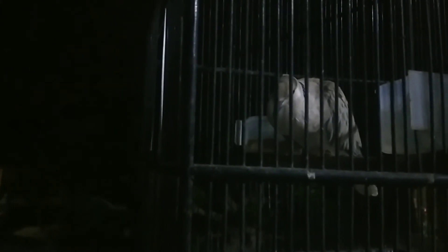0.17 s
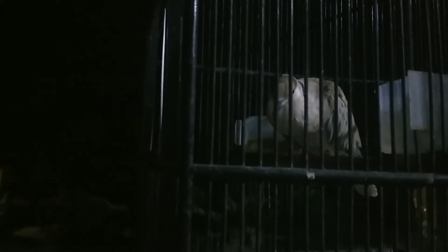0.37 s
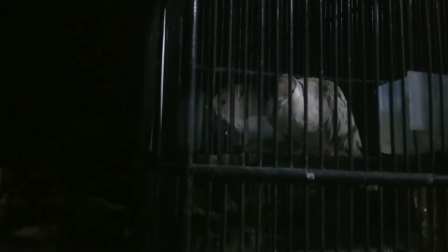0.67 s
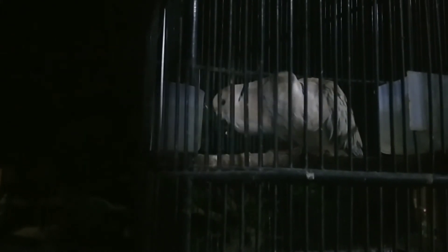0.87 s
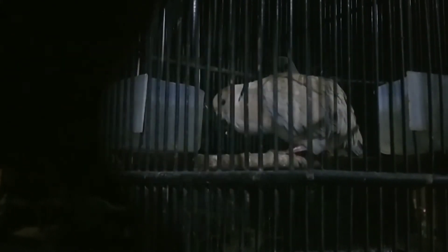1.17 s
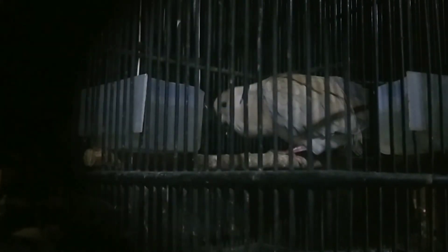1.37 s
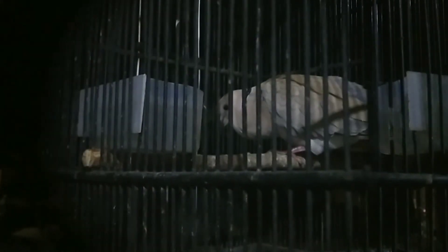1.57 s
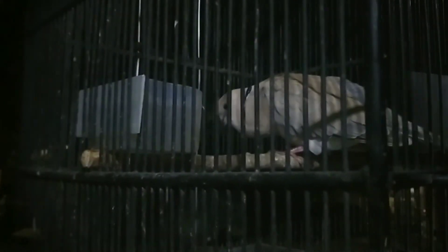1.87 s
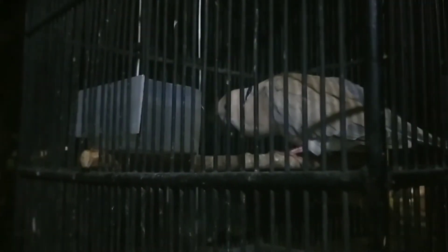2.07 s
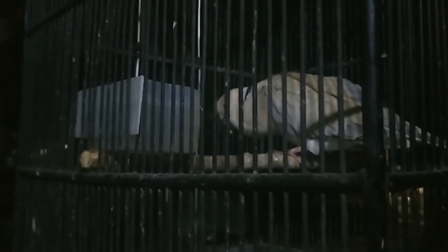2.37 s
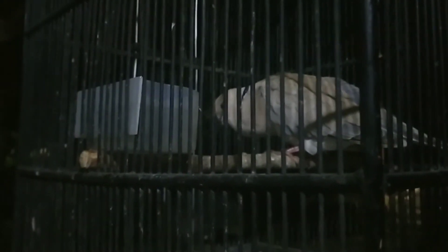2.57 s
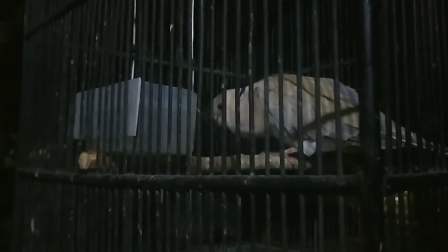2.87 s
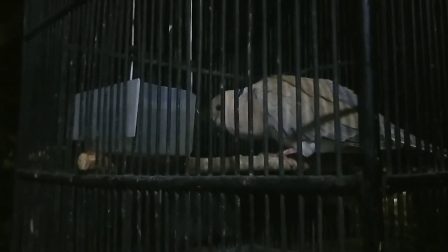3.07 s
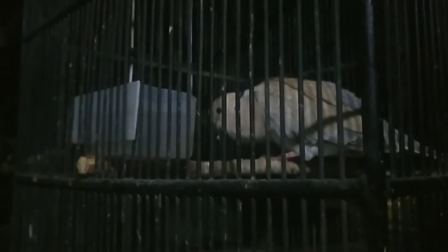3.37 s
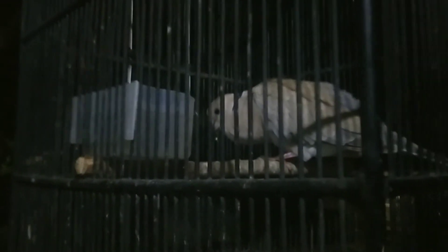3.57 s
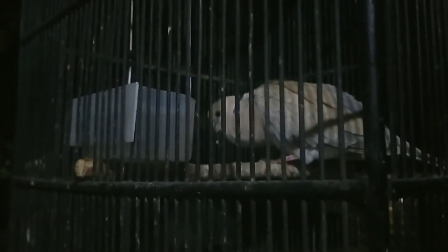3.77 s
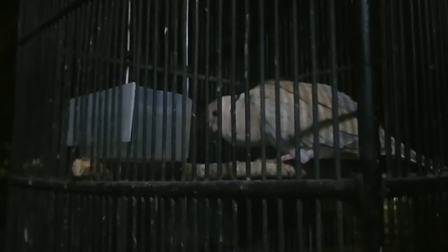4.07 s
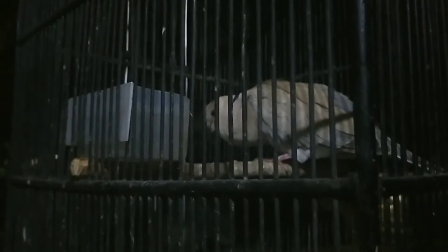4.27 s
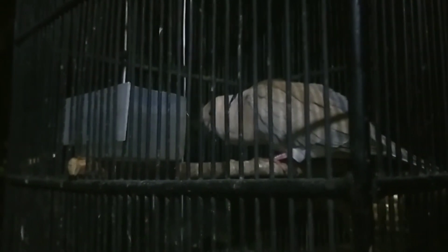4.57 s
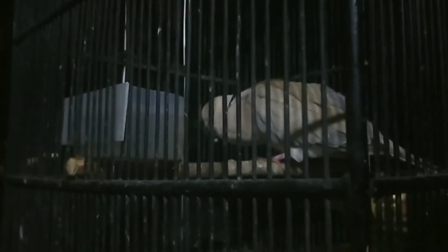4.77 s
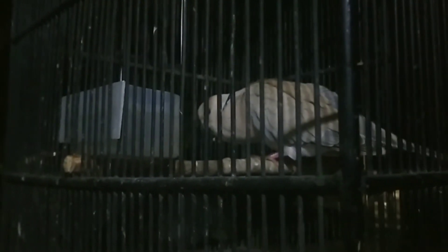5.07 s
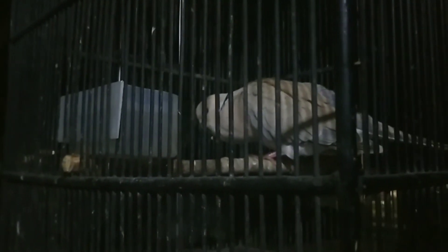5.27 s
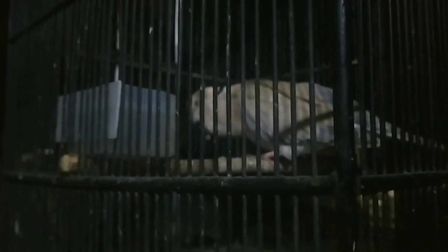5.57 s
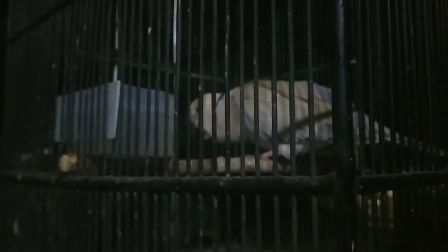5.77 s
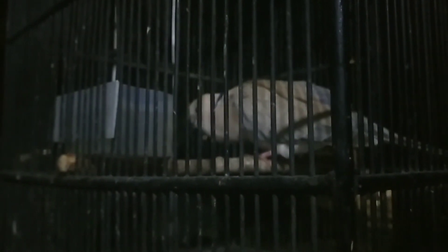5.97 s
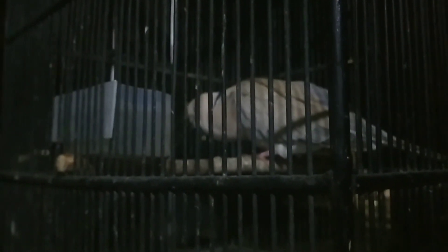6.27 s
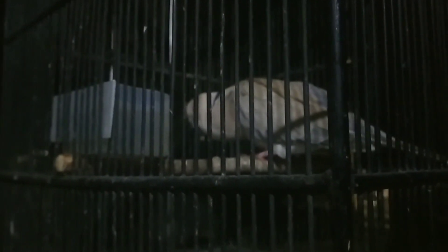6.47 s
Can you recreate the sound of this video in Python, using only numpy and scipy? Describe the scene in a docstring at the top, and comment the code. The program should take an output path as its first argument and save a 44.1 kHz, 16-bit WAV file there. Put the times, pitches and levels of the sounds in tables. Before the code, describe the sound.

Outdoors at night, a dove in a cage coos close to the microphone. The tail of one long coo fades, then a buzzy intake leads to a short coo, a stutter of growing soft notes and a long smooth coo that sinks away. Another rough intake, short coo and stutter follow, cut off at the end. A near katydid chirps rapidly throughout over distant katydids, insect chorus and faint low rumble.

```python
"""A caged dove coos outdoors at night, close to the microphone: near-sinusoids with weak overtones.
The fading end of one long coo leads to a full phrase: buzzy intake (pulses ringing a throat resonance),
short coo, swelling stutter and a long coo that sinks away; a second phrase gets as far as its stutter.
Katydids, one near (trains of gliding whistles) and others far (throbbing noise bands), sing over an insect
chorus, a cricket trill, a faint hoarse animal call, soft rustles and swells, ticks, rumble, air and hiss."""
import sys
import numpy as np
from scipy import signal
from scipy.fft import rfft, irfft
from scipy.io import wavfile
from scipy.ndimage import uniform_filter1d

SR = 44100
rng = np.random.default_rng(int(sys.argv[2]) if len(sys.argv) > 2 else 0)


def dump_mix(stems):
    """Bounce the given channels to the path in sys.argv[1] as a 16-bit WAV at rate SR."""
    frames = np.atleast_2d(stems).T  # one column per channel
    limited = np.clip(frames, -1, 1)  # hard clip at full scale
    pcm = np.round(limited * 32767).astype(np.int16)
    wavfile.write(sys.argv[1], SR, pcm)


N = 292383
TIME = np.arange(N) / SR  # s
BINS = np.fft.rfftfreq(N, 1 / SR)  # Hz
# upper band edge of the hiss and of the output [f/Hz]
EDGE_HZ = 14300


def amp(db):
    """Amplitude ratio from level: 20 dB is a factor of ten."""
    return 10 ** (np.asarray(db) / 20)


def unit(x):
    """Normalisation to a root-mean-square of 1."""
    return x / np.sqrt(np.mean(x ** 2) + 1e-20)


def read(points, hz):
    """Interpolation of a spectrum along a logarithmic frequency axis."""
    f, value = np.transpose(points)
    return np.interp(np.log(hz + 1), np.log(f + 1), value)


def add(mix, s, sound):
    """Superposition: a sound is added to the mix from time s, in place."""
    part = mix[max(round(s * SR), 0):][:len(sound)]
    part += sound[:len(part)]


def drift(rate_hz):
    """Random modulation: low-passed Gaussian noise of rms 1."""
    white = rfft(rng.standard_normal(N))
    return unit(irfft(white / (1 + (BINS / rate_hz) ** 4), N))


def sides(balance_db):
    """Interchannel level difference: left and right gains whose mean is 1."""
    balance = np.atleast_1d(balance_db)
    gains = amp(np.array([balance, -balance]) / 2)
    return gains / gains.mean(0)


def gate(start, end, fade):
    """Time window: 1 between two times, with short linear ramps."""
    return np.clip(np.minimum(TIME - start, end - TIME) / fade + .5, 0, 1)


def resonate(x, hz, width):
    """Resonance by heterodyne: shift the moving centre to zero, low-pass, and shift back."""
    turn = np.exp(2j * np.pi * np.cumsum(hz * np.ones(N)) / SR)
    r = np.exp(-np.pi * width / SR)
    baseband = signal.lfilter([1 - r], [1, -r], x / turn + 1e-18)
    return 2 * (turn * baseband).real


def noise(gain, alike, balance_db):
    """Partly coherent noise: coloured, with a set interchannel correlation; the mid signal has rms 1."""
    a, b = rng.standard_normal((2, N))
    c = np.clip(alike, -1, 1)
    channels = np.array([a, c * a + np.sqrt(1 - c * c) * b])
    pair = irfft(rfft(channels) * gain, N) * sides(balance_db)
    return pair / pair.mean(0).std()


def echoes(x, t60, delay):
    """Diffuse reflection: exponentially decaying noise taps, independent at each microphone."""
    t = TIME[:SR // 2]
    taps = rng.standard_normal((2, len(t))) * amp(-60 * t / t60) * (t > delay)
    taps = taps / np.linalg.norm(taps, axis=1)[:, None]
    return signal.fftconvolve(x[None], taps, axes=1)[:, :N]


def dove(room_db=-24):
    """Direct plus diffuse sound: the cage's standing waves give the channels different gain and phase."""
    # the sinking end of a long coo [t/s, f/Hz, level/dB]
    fading_coo = [(0.0, 406, -34.5), (0.02, 399, -35), (0.392, 377.6, -43), (0.565, 355.7, -41.5),
                  (0.61, 348, -48), (0.648, 339, -47), (0.668, 325.5, -65), (0.715, 316, -56),
                  (0.76, 295, -74)]
    # a short coo that scoops up, breaks into the high register and sags [t/s, f/Hz, level/dB]
    first_coo = [(1.49, 359, -58.5), (1.511, 400, -36.5), (1.54, 447, -24), (1.557, 495, -25.5),
                 (1.62, 490.5, -29), (1.67, 470.4, -27), (1.717, 456.4, -27), (1.745, 446, -38.5),
                 (1.78, 453, -50), (1.82, 456, -66)]
    # a scoop, one flat arch, then a drop to the low register and a slow sinking [t/s, f/Hz, level/dB]
    long_coo = [(2.581, 372.2, -54), (2.59, 383.4, -41), (2.647, 445, -24.5), (2.68, 483.3, -26),
                (2.7, 488.3, -28.5), (2.745, 496, -28.5), (2.773, 466.6, -26), (2.801, 467, -27.5),
                (2.82, 480.2, -28), (2.949, 477.3, -26.5), (3.339, 492, -28.5), (4.11, 482.2, -25),
                (4.151, 481.4, -27), (4.35, 474, -25.5), (4.462, 463.2, -24), (4.5, 421, -30),
                (4.521, 415.7, -32.5), (4.58, 401.5, -41), (4.851, 373.4, -41), (4.885, 368.6, -46),
                (4.98, 349.3, -47), (5.03, 334, -59), (5.052, 335, -65), (5.1, 321, -62.5)]
    # a short coo that stays in the low register [t/s, f/Hz, level/dB]
    last_coo = [(5.785, 359.6, -67.5), (5.808, 403, -38), (5.827, 434.4, -28.5), (5.841, 439.6, -25),
                (6.008, 420.2, -31.5), (6.034, 440, -37), (6.06, 445, -72)]
    # buzzy intakes, uneven in level [t/s, level/dB, pulse rate/Hz, throat resonance f/Hz]
    intake_curves = [
        [(0.86, -46, 141, 474), (0.9, -45.5, 139.1, 488), (.97, -45.5, 134.5, 454), (1.012, -46, 136.1, 472),
         (1.045, -45.5, 134, 475), (1.092, -47.5, 130.7, 484), (1.106, -44.5, 133.7, 499),
         (1.235, -45.5, 131.3, 505), (1.265, -43, 138.6, 552), (1.286, -42.5, 143.1, 543),
         (1.316, -44, 136.1, 585), (1.352, -44, 130, 586), (1.403, -42, 127.1, 616), (1.42, -45, 125.4, 630),
         (1.446, -49.5, 122.4, 608), (1.462, -59, 122, 606)],
        [(5.135, -48, 137.2, 445), (5.145, -49, 137.1, 471), (5.19, -49.5, 132.9, 475), (5.32, -54, 129, 430),
         (5.352, -53, 126.4, 436), (5.385, -49.5, 127.6, 456), (5.44, -52, 129.5, 447),
         (5.475, -52, 130.6, 463), (5.5, -46, 135.6, 525), (5.535, -40.5, 137.7, 550),
         (5.56, -46.5, 136.2, 590), (5.58, -45.5, 134.6, 615), (5.604, -44.5, 137.5, 650),
         (5.612, -37.5, 135.5, 660), (5.626, -40.5, 135.4, 644), (5.645, -46, 133.5, 655),
         (5.7, -43.5, 131, 650), (5.753, -50.5, 122, 615)],
    ]
    # the cage favours the left side for low notes [f/Hz, left-right level/dB]
    cage_balance = [(250, 11), (380, 12.5), (410, 11.5), (438, 6), (468, 1), (550, -1), (680, -3.5),
                    (1200, 2.5)]
    # the left microphone leads a little [f/Hz, phase/rad]
    cage_lead = [(350, 0.11), (415, 0.081), (445, 0.15), (470, 0.15), (490, 0.5), (600, 0.25)]
    coos = sum(coo(rows) for rows in (fading_coo, first_coo, long_coo, last_coo))
    voice = coos + stutter() + sum(intake(rows) for rows in intake_curves)
    half_lead = np.array([[.5], [-.5]]) * read(cage_lead, BINS)
    ports = sides(read(cage_balance, BINS)) * np.exp(1j * half_lead)
    return irfft(rfft(voice) * ports, N) + amp(room_db) * echoes(voice, t60=1.0, delay=0.066)


def coo(rows, jitter=0.0035, shimmer=0.032, fuzz_db=-50, buzz_rough=.5):
    """Near-sinusoidal voice of a swollen throat; frequency and amplitude tremble more in the low register."""
    # overtones by pitch, the low register being the richer one [f/Hz, level under the fundamental/dB]
    second_harmonic = [(300, -7), (326, -6.5), (345, -29), (378, -24.5), (410, -27.5), (440, -36),
                       (456, -47.5), (480, -67)]
    third_harmonic = [(300, -18), (372, -43.5), (408, -25), (440, -44.5), (480, -40)]
    # the long coo turns husky before it sinks [start t/s, end t/s, extra air level/dB]
    husky_from, husky_to, husky_db = (4.0, 4.44, 17)
    # for a moment the third harmonic buzzes [start t/s, end t/s, level under the fundamental/dB]
    buzz_from, buzz_to, buzz_db = (4.03, 4.12, -39)
    s, *columns = np.transpose(rows)
    hz, level = (np.interp(TIME, s, c) for c in columns)
    swing_hz, beat_db = scoop_beat()
    flick_hz, dip_db = catches()
    hz = hz + swing_hz + flick_hz
    level = level + beat_db - dip_db
    slack = np.interp(hz, [390, 460], [3.5, 1])
    phase = 2 * np.pi * np.cumsum(hz * (1 + slack * jitter * drift(110))) / SR
    tone = np.sin(phase) * (1 + slack * shimmer * drift(52))
    air = amp(fuzz_db + husky_db * gate(husky_from, husky_to, 0.046)) * slack ** 2
    fuzz = air * drift(82) * np.sin(phase * 1.26)  # a little air just above the note
    since_start = abs(TIME - s[0])
    late_db = -7 * np.exp(-since_start / 0.22)  # the third harmonic is the last to build up
    buzz = amp(buzz_db) * gate(buzz_from, buzz_to, 0.012) * (1 + buzz_rough * drift(100))
    overtones = amp(read(second_harmonic, hz)) * np.sin(2 * phase)
    overtones += (amp(read(third_harmonic, hz) + late_db) + buzz) * np.sin(3 * phase)
    overtones *= amp(-11 * np.exp(-since_start / 0.011))  # each coo starts pure and then fills out
    return np.sqrt(2) * (tone + fuzz + overtones) * amp(level) * gate(s[0], s[-1], 0.007)


def scoop_beat():
    """Decaying beat, as a swing of pitch (Hz) and level (dB) in antiphase: flattest where loudest."""
    # after the break, the scoop's echo beats briefly with the new note
    # [start t/s, pitch swing/Hz, beat rate/Hz, level swing/dB, decay time/s]
    start, swing_hz, rate, swing_db, dying = (2.674, 3, 64, 1.4, 0.077)
    t = np.maximum(TIME - start, 0)
    beat = np.exp(-t / dying) * np.sin(2 * np.pi * rate * t)
    return -swing_hz * beat, swing_db * beat


def catches():
    """Transient modulation: Gaussian flicks of pitch (Hz) and dips of level (dB) where the voice catches."""
    # catches, as at a change of register [t/s, dip/dB, half length/s, pitch flick/Hz]
    catch_rows = [(1.551, 9, 0.0032, 55), (1.567, 6.5, 0.0064, 7.5), (1.736, 12, 0.004, -57),
                  (2.665, 8.5, 0.0043, 39.5), (4.515, 6, 0.0045, -28), (1.361, 4.5, 0.0026, 0),
                  (5.544, 13, .003, -1)]
    flick, dip = np.zeros((2, N))
    for at, depth_db, half, flick_hz in catch_rows:
        catch = np.exp(-np.minimum(((TIME - at) / half) ** 2, 20))
        flick, dip = flick + flick_hz * catch, dip + depth_db * catch
    return flick, dip


def stutter(hz=440, half=0.0051, squareness=3.3, fall=0.1, after_db=-12, after_at=0.014,
            after_half=0.02, after_hz=368, gain_db=-.5, low_hz=318):
    """Tone bursts: each puff of a few falling cycles trails a lower flutter; stronger puffs last longer."""
    # loud notes that slow down and mostly grow louder, with faint ones between the last
    # [t/s, level before gain_db/dB]
    notes = [(1.991, -44), (2.034, -42), (2.085, -40.5), (2.138, -36), (2.198, -33), (2.2647, -31),
             (2.339, -28), (2.381, -43), (2.426, -28), (2.4792, -39.5), (2.525, -27.5), (6.283, -46),
             (6.327, -41), (6.377, -41), (6.433, -36.5), (6.49, -33.5), (6.5558, -29), (6.629, -28)]
    out, t = np.zeros(N), TIME[:SR // 8] - .02
    for s, db in notes:
        length = amp(0.38 * (db + 32.0))  # relative to a note at -32 dB
        glide = hz * (1 - fall * np.tanh(t / 0.0093))
        envelope = np.exp(-abs(t / length / half) ** squareness)
        puff = envelope * np.sin(2 * np.pi * np.cumsum(glide) / SR)
        first, late = rng.random(2)
        swell = np.exp(-((t - after_at) / length / after_half) ** 2)
        flutter = swell * np.sin(2 * np.pi * (after_hz * t + first))
        late_swell = np.exp(-((t / length - .038) / 0.017) ** 2)
        flutter += 0.39 * late_swell * np.sin(2 * np.pi * (400 * t + late))
        flutter *= 1 + 0.55 * np.sin(2 * np.pi * (90 * t + late))
        add(out, s - .02, amp(db + gain_db) * (puff + amp(after_db) / length * flutter))
    # the throat radiates little below its resonance
    return irfft(rfft(out) / np.sqrt(1 + (low_hz / (BINS + 1)) ** 20), N)


def intake(rows, width_hz=140, jitter=0.11, swing=.05, chest_hz=380, chest_width_hz=200,
           chest_db=-21, hum_db=-68, calm_rough=.08):
    """Source and filter: slow pulses of drawn air ring a moving throat resonance, over a low hum."""
    # spells in which the buzz breaks up [start t/s, end t/s, added roughness/1, strong-weak limp/1]
    spells = [(.99, 1.03, .15, .4), (1.03, 1.18, .2, .1), (1.18, 1.26, .25, .4), (1.305, 1.41, .42, .15),
              (5.35, 5.485, .27, .3), (5.545, 5.6, .4, .1), (5.635, 5.74, .14, .05)]
    # fixed resonances of the cage that the buzz excites [f/Hz, width/Hz, level/dB]
    cage_ring = [(545, 45, -7), (660, 60, -3)]
    s, *columns = np.transpose(rows)
    level, rate, hz = (np.interp(TIME, s, c) for c in columns)
    rough = calm_rough + sum(r * gate(start, end, .015) for start, end, r, _ in spells)
    limp = sum(m * gate(start, end, .015) for start, end, _, m in spells)
    steady = np.cumsum(rate) / SR  # pulses counted so far
    turns = steady + jitter * rough * drift(70) + swing * limp * np.cos(np.pi * steady)
    pulses = sum(np.cos(2 * np.pi * k * turns) for k in range(2, 9))
    pulses = pulses * np.exp(.4 * rough * drift(84))
    pulses *= 1 + limp * np.cos(np.pi * turns)  # strong and weak pulses alternate
    # a puff of air with each pulse
    pulses += 1.6 * rough * drift(700) * (1 + .5 * np.cos(2 * np.pi * turns))
    chest = amp(chest_db) * resonate(pulses, chest_hz, chest_width_hz)
    voice = resonate(resonate(pulses, hz, width_hz), hz, width_hz) - chest
    voice = voice + sum(amp(db) * resonate(voice, ring_hz, width) for ring_hz, width, db in cage_ring)
    voice /= np.sqrt(uniform_filter1d(voice ** 2, size=1300) + 1e-9)  # even out, so that level governs
    hum = amp(hum_db) * np.sqrt(2) * np.sin(2 * np.pi * 2 * steady)  # the body passes the second harmonic
    return (voice * amp(level - catches()[1]) + hum) * gate(s[0], s[-1], 0.0043)


def katydid(sweep=0.0523, half=0.00373, rasp=0.26, uneven_db=0.5, octave_db=-33, balance_db=2):
    """Stridulation: each chirp is a run of quick wing scrapes, whistles that fall in pitch, with echoes."""
    # bouts, each at an even tempo [start t/s, end t/s, chirp period/s, 0 full chirps or 1 paired strokes]
    bouts = [(.062, 1.39, .1152, 0), (1.493, 2.35, .115, 0), (2.421, 4.86, .11935, 0),
             (4.919, 6.6, .1153, 1)]
    # level of each bout, to which the stroke levels are added [level/dB]
    bout_db = [-48, -41.5, -42, -39.5]
    # wing strokes in a chirp [t from the main stroke/s, full-chirp level/dB, paired-chirp level/dB, f/Hz]
    strokes = [(-.031, -10.5, -17, 6150), (-.021, -5, -3.5, 6260), (-.011, -4, -10, 6250),
               (-.001, -2, -1.5, 6280), (.009, -3.5, -4.5, 6200)]
    song, t = np.zeros(N), TIME[:SR // 50] - 1 / 100
    chirps = [(s, db, paired) for (start, end, period, paired), db in zip(bouts, bout_db)
              for s in np.arange(start, end, period)]
    chances = rng.standard_normal((len(chirps), len(strokes), 3))
    for (s, db, paired), chirp_chances in zip(chirps, chances):
        for (offset, full_db, paired_db, hz), (slip, detune, force) in zip(strokes, chirp_chances):
            glide = hz * (1 + 0.0051 * detune - sweep * t / half)
            phase = 2 * np.pi * np.cumsum(glide) / SR
            whistle = np.sin(phase) + amp(octave_db) * np.sin(2 * phase)
            scrape = np.exp(-(t / half) ** 2) * whistle
            stroke_db = db + (paired_db if paired else full_db) + uneven_db * force
            add(song, s + offset + .001 * slip + t[0], amp(stroke_db) * scrape)
    song *= 1 + rasp * drift(630)
    return sides(balance_db) * (song + amp(-5) * echoes(song, t60=0.14, delay=0.004))


def far_katydids(half=0.03, rasp=0.38, balance_db=3):
    """Temporal smearing: distance blurs each chirp into a soft, grainy swell of band noise."""
    # farther, higher katydids throb at tempos of their own [start t/s, end t/s, chirp period/s]
    far_bouts = [(.052, 1.38, .108), (1.427, 3.12, .1099), (3.185, 4.8, .1062), (4.866, 5.44, .1078),
                 (5.508, 6.7, .1092), (.055, 3.1, .1222)]
    # level at the top of each bout's swells [level/dB]
    far_bout_db = [-56.5, -55.5, -54.5, -59.5, -54.5, -61.5]
    # relative spectrum of their rasp [f/Hz, level/dB]
    far_rasp = [(5900, -41), (6450, -6), (6750, 3), (6950, 2), (7200, -8.5), (7500, -16.5), (7900, -15.5),
                (8600, -45), (10000, -52.5)]
    power = np.zeros(N)
    for (start, end, period), db in zip(far_bouts, far_bout_db):
        count = np.clip(np.round((TIME - start) / period), 0, (end - start) // period)
        nearest = start + period * count
        power += amp(db) ** 2 * np.exp(-np.minimum(((TIME - nearest) / half) ** 2, 20))
    colour = amp(read(far_rasp, BINS)) * (abs(BINS - 7500) < 2500)
    grain = 1 + rasp * drift(100)
    return np.sqrt(power) * grain * noise(colour, alike=.1, balance_db=balance_db)


def insects(chorus_db=-2.05, trill_db=-61.0, flutter=0.13, waver_hz=9):
    """Incoherent summation: a high chorus and a lower cricket trill as noise bands with wavering tones."""
    # course of the chorus, before chorus_db [t/s, level/dB]
    chorus_level = [(0, -56), (1.3, -53.5), (1.7, -54), (4.6, -54), (4.85, -48.5), (5.3, -52.5),
                    (6.6, -51.5)]
    # relative spectra of the high chorus and the lower cricket trill [f/Hz, level/dB]
    chorus_spectrum = [(5000, -48), (5600, -15.5), (6100, -11.5), (6450, -2), (6750, -1.5), (6950, -5),
                       (7150, -13.5), (7450, -24), (7900, -27.5), (8500, -47.5)]
    trill_spectrum = [(1900, -24), (2120, -10), (2230, -7.5), (2295, 0.5), (2345, -7), (2420, -6.5),
                      (2490, -12), (2600, -29.5)]
    # narrow wavering tones within the chorus and trill [f/Hz, level/dB]
    tone_rows = [(2295, -63), (2389, -69), (2433, -83), (6522, -59.5), (6721, -64), (6879, -64),
                 (6921, -70.5), (7024, -66)]
    level = amp(np.interp(TIME, *np.transpose(chorus_level)) + chorus_db)
    chorus_colour = amp(read(chorus_spectrum, BINS) - 60 * (abs(BINS - 6750) > 1900))
    chorus = noise(chorus_colour, alike=0.051, balance_db=3.5)
    trill_colour = amp(read(trill_spectrum, BINS) - 60 * (abs(BINS - 2250) > 450))
    trill = noise(trill_colour, alike=0.072, balance_db=5.0)
    # the tones waver independently at each microphone
    tones = [sum(amp(db) * np.sin(2 * np.pi * np.cumsum(hz + waver_hz * drift(22.56)) / SR)
                 for hz, db in tone_rows) for side in "LR"]
    bands = level * chorus * (1 + flutter * drift(76)) + amp(trill_db) * trill
    return bands + np.sqrt(2) * sides(5.0) * np.array(tones)


def far_call(waver=0.0073, breath_db=-11, gain_db=-2.0, direct_db=-4, balance_db=3):
    """Formant filtering: throat-weighted harmonics make a hoarse arch, heard mostly as reflections."""
    # a far animal's drawn-out call [t/s, f/Hz, level before gain_db/dB]
    call_curve = [(0.082, 450.6, -66), (0.161, 465.3, -55.5), (0.269, 493, -51), (0.391, 472.4, -61),
                  (.56, 445, -62)]
    # relative throat response [f/Hz, level/dB]
    throat = [(450, -20), (900, -12), (1450, -0.5), (1900, 8.5), (2350, -18), (2900, -9), (3350, -9),
              (4200, -12)]
    s, *columns = np.transpose(call_curve)
    hz, level = (np.interp(TIME, s, c) for c in columns)
    phase = 2 * np.pi * np.cumsum(hz * (1 + waver * drift(54))) / SR
    call = unit(sum(amp(read(throat, k * hz)) * np.sin(k * phase) * (1 + amp(breath_db) * drift(150))
                    for k in range(1, 10)))
    call = call * amp(level + gain_db) * gate(s[0], s[-1], 0.034)
    return sides(balance_db) * (amp(direct_db) * call + echoes(call, t60=1.0, delay=0.00046))


def rustles_and_swells(ragged_db=2.0):
    """Band-limited noise under cosine envelopes: narrow bands sound toned, wide ones hazy or rough."""
    # soft rustles, bumps, and hazy rough or toned swells
    # [t/s, length/s, level/dB, centre f/Hz, width/Hz, left-right level/dB]
    soft_sounds = [(0.183, 0.51, -67, 128, 122, 13), (0.247, 0.64, -62, 826, 197, -0.5),
                   (0.375, 1, -66, 1500, 700, -14), (0.887, .12, -75, 8800, 2500, 3),
                   (0.964, 0.27, -73.5, 3200, 900, 3), (1.26, 0.2, -61.5, 160, 159, 14),
                   (1.325, 0.32, -79, 8900, 2500, 7), (2.004, 0.42, -73.5, 3400, 1200, 2),
                   (2.603, 0.16, -70, 3960, 1200, 3), (2.62, 0.27, -67.5, 8300, 2900, 10),
                   (4.048, 0.14, -67, 3440, 526, 9), (4.07, 0.2, -59.5, 1490, 280, 6.5),
                   (4.153, .4, -66, 860, 300, 2), (4.203, 0.7, -66, 180, 80, 12),
                   (6.24, 0.18, -62.5, 262, 35, 14), (6.25, 0.81, -67, 724, 190, 0)]
    out, ragged = np.zeros((2, N)), drift(35)
    for s, length, db, hz, width, balance_db in soft_sounds:
        swell = np.cos(np.pi * np.clip((TIME - s) / length, -.5, .5))
        colour = (1 + ((BINS - hz) / width) ** 2) ** -2 * np.minimum(BINS / hz, 1) ** 2
        out += amp(db + ragged_db * ragged) * swell * noise(colour, alike=0.2, balance_db=balance_db)
    return out


def ticks(decay=0.00087, gain_db=-2, balance_db=3):
    """Impulsive sound: differencing brightens a rapidly decaying noise burst into a tiny click."""
    # faint sharp ticks [t/s, level before gain_db/dB]
    clicks = [(1.583, -50), (4.199, -51)]
    out, t = np.zeros(N), TIME[:SR // 100]
    for s, db in clicks:
        burst = rng.standard_normal(len(t)) * np.exp(-t / decay)
        add(out, s, amp(db + gain_db) * np.diff(burst))
    return sides(balance_db) * out


def night(air_db=-63, hiss_db=-74):
    """Ambient noise: nearly coherent low rumble, with less coherent still air and a faint hiss."""
    # course of the low rumble, louder near the start and the end [t/s, level/dB]
    rumble_level = [(0, -70), (1.35, -67), (2.2, -68.5), (3.3, -70.5), (5.9, -70), (6.5, -67)]
    # relative spectra of the rumble, the still air and the hiss [f/Hz, level/dB]
    rumble_spectrum = [(20, -36), (40, -24.5), (62, -14), (95, 0), (130, -2), (190, -3), (265, -6.5),
                       (340, -22.5), (600, -42)]
    air_spectrum = [(100, -43), (280, -4), (450, 10.5), (750, 1), (930, 1), (1080, -1), (1300, -4),
                    (1600, -4), (1830, -0.5), (2050, -13.5), (2700, -3.5), (3400, -9), (4700, -7.5),
                    (5050, -23.5), (7000, -43)]
    hiss_spectrum = [(3000, -36), (5200, -8.5), (8000, -1), (9500, -11.5), (11300, -15), (12500, -3),
                     (14200, -6)]
    swell_db = .9 * drift(4)
    rumble_db = np.interp(TIME, *np.transpose(rumble_level)) + 1.3 * drift(3.5)
    rumble_colour = amp(read(rumble_spectrum, BINS)) * (BINS < 600)
    rumble = amp(rumble_db) * noise(rumble_colour, alike=0.94, balance_db=13.0)
    air_colour = amp(read(air_spectrum, BINS)) * (BINS > 100)
    air = amp(air_db + swell_db) * noise(air_colour, alike=0.14, balance_db=1.5)
    hiss_colour = amp(read(hiss_spectrum, BINS)) * (BINS < EDGE_HZ)
    hiss = amp(hiss_db + 0.83 * drift(7.3)) * noise(hiss_colour, alike=.05, balance_db=3.0)
    return rumble + air + hiss


def scene():
    """Linear superposition: the dove in front, the night behind."""
    animals = dove() + katydid() + far_katydids() + insects() + far_call()
    return animals + rustles_and_swells() + ticks() + night()


def record(dry, notch_hz=4920, notch_width_hz=130, notch_db=-9):
    """Linear filtering: a narrow notch in the microphone's response, then the recorder's band limit."""
    notch = amp(notch_db * np.exp(-((BINS - notch_hz) / notch_width_hz) ** 2))
    coloured = irfft(rfft(dry) * notch, N)
    low_pass = signal.firwin(511, EDGE_HZ, window=("kaiser", 9), fs=SR)
    return signal.oaconvolve(coloured, low_pass[None], "same")


dry = scene()
out = record(dry)
dump_mix(out)
```